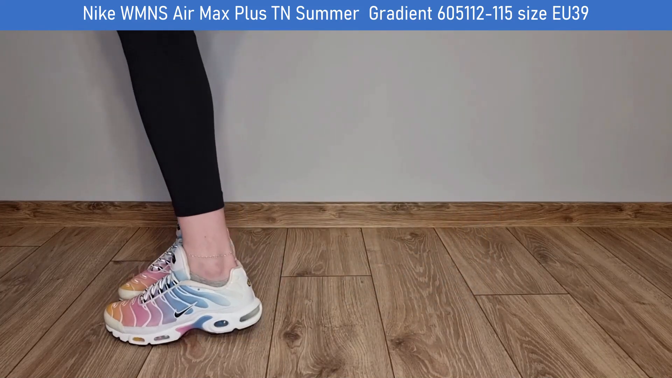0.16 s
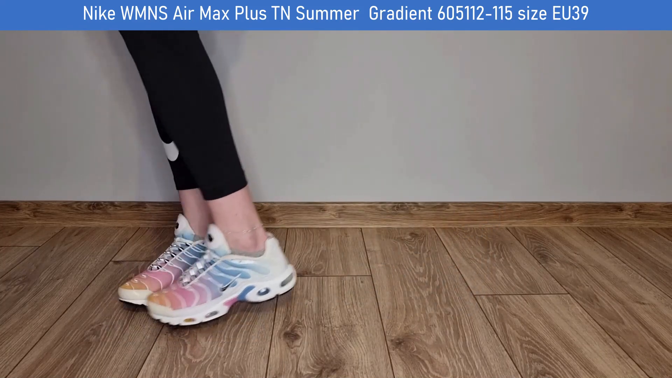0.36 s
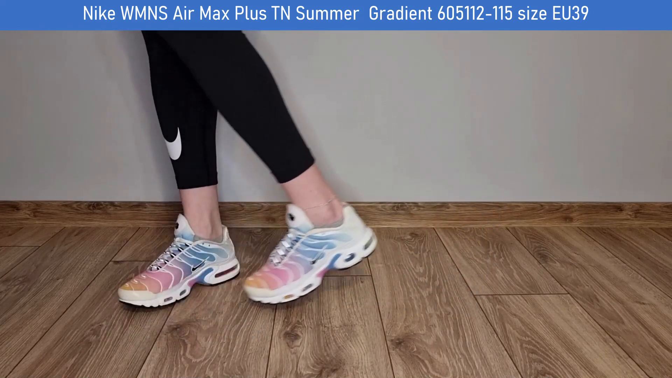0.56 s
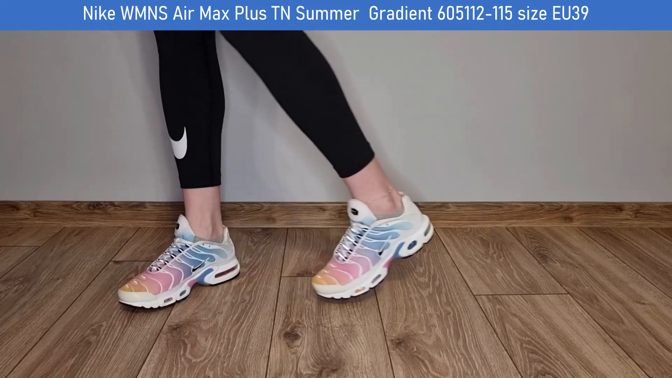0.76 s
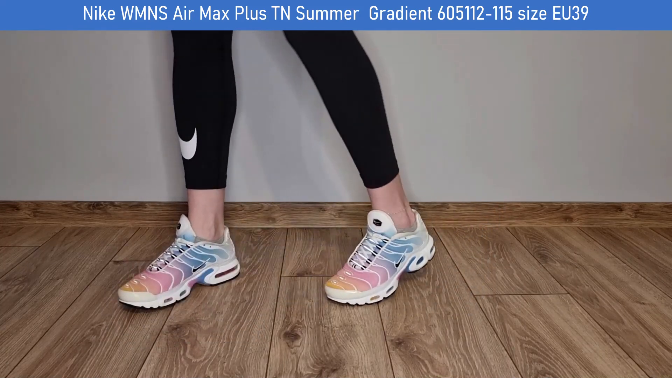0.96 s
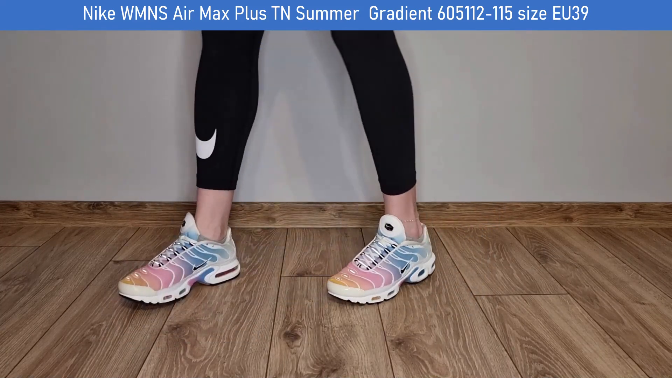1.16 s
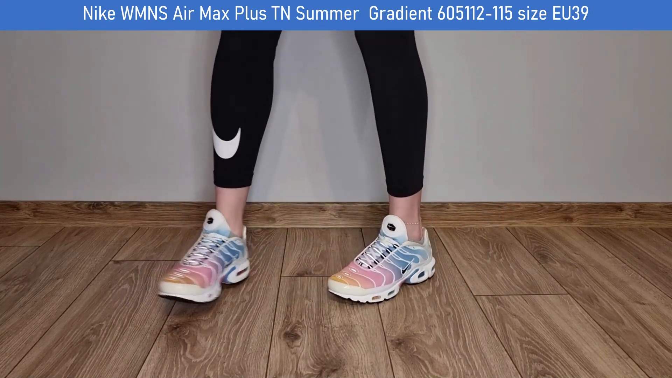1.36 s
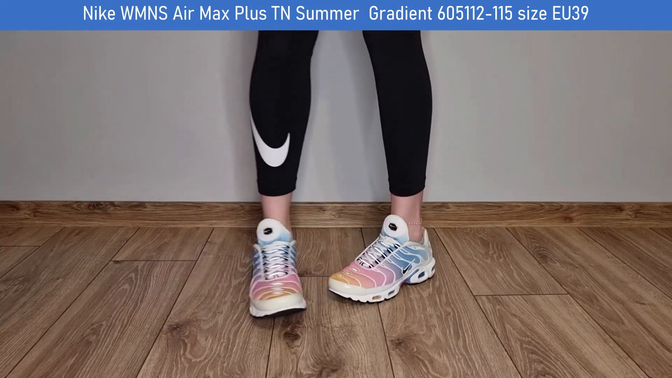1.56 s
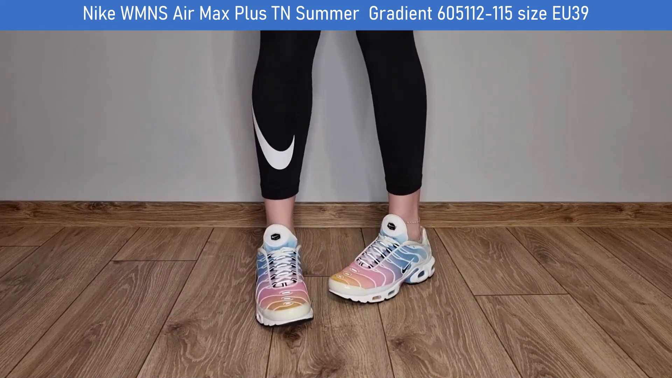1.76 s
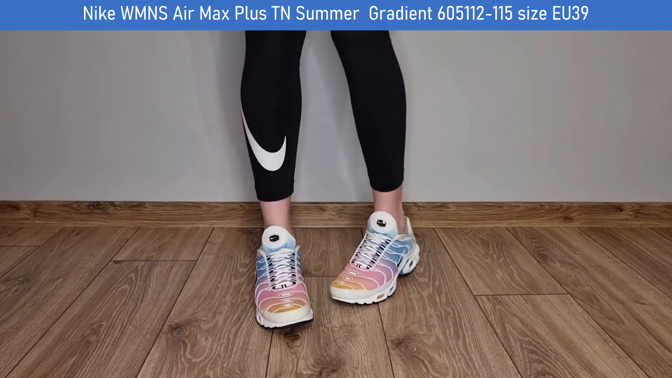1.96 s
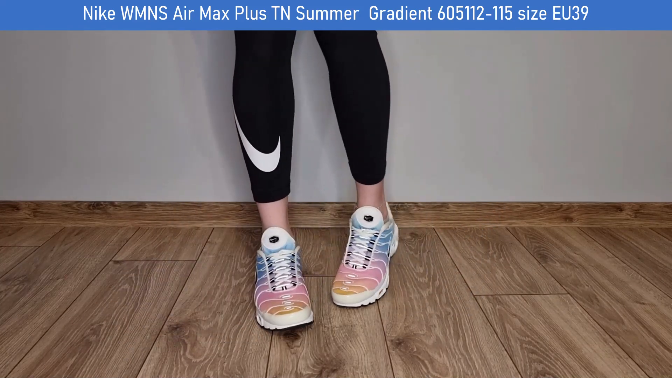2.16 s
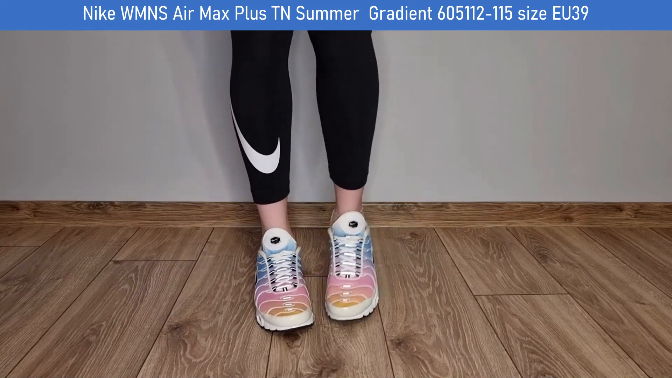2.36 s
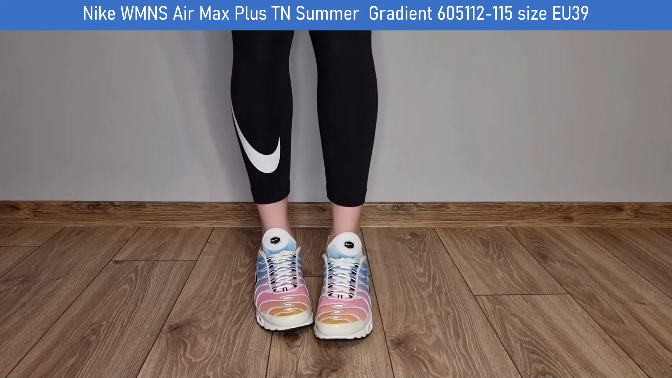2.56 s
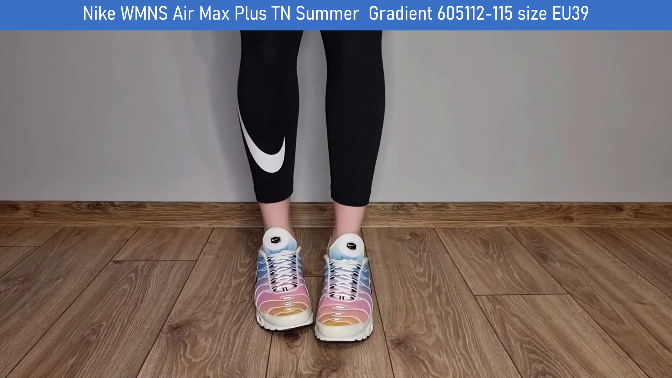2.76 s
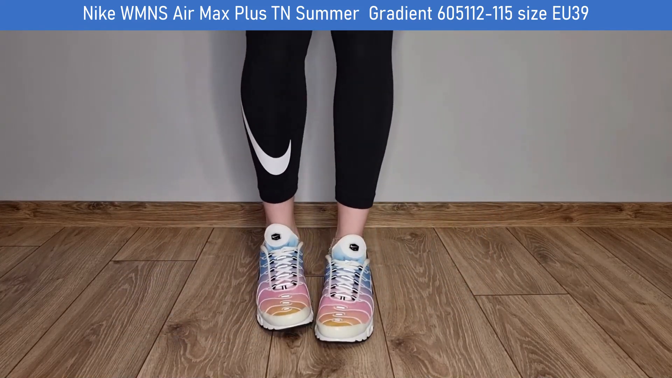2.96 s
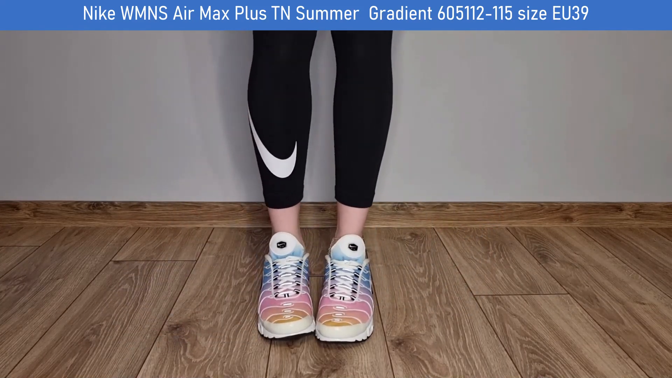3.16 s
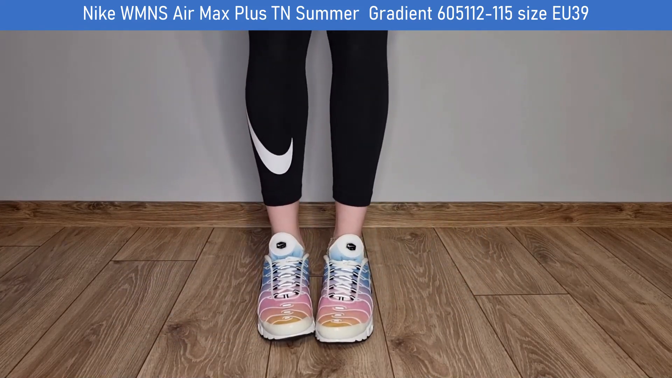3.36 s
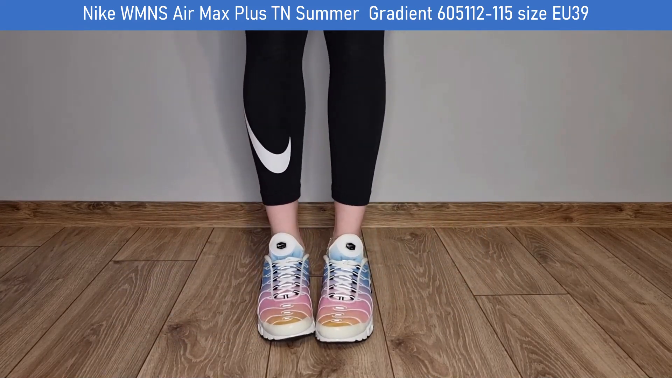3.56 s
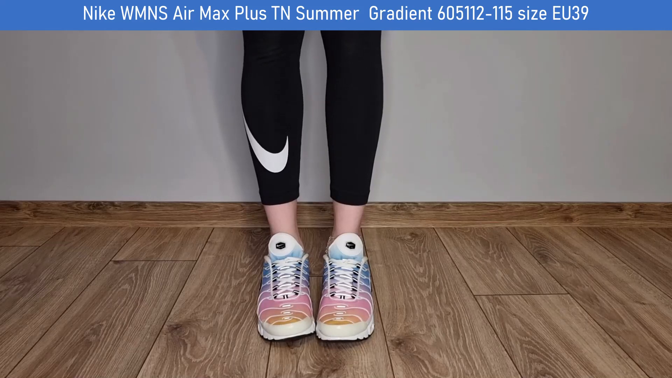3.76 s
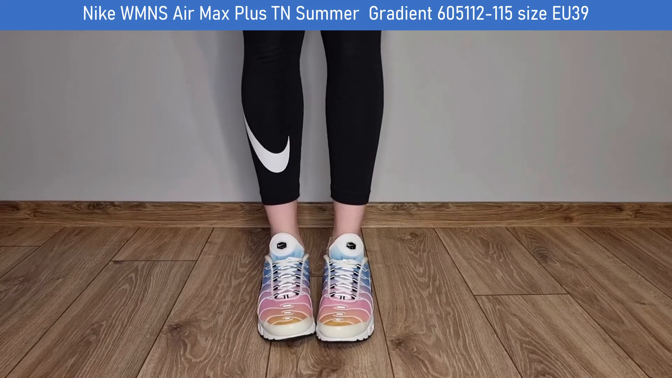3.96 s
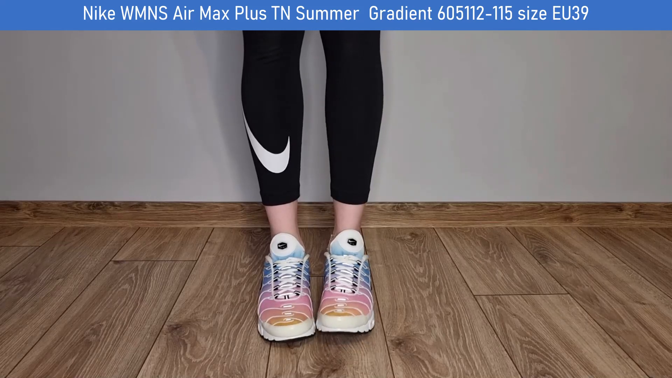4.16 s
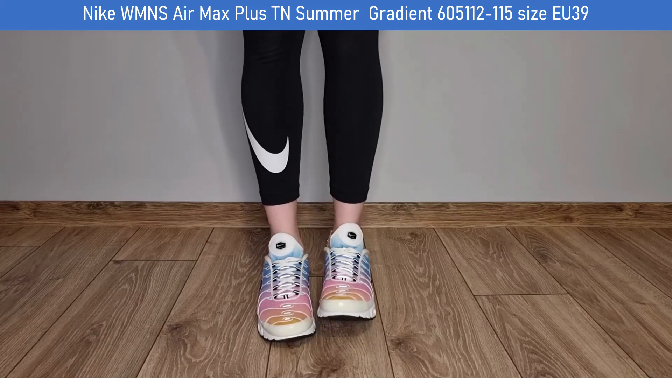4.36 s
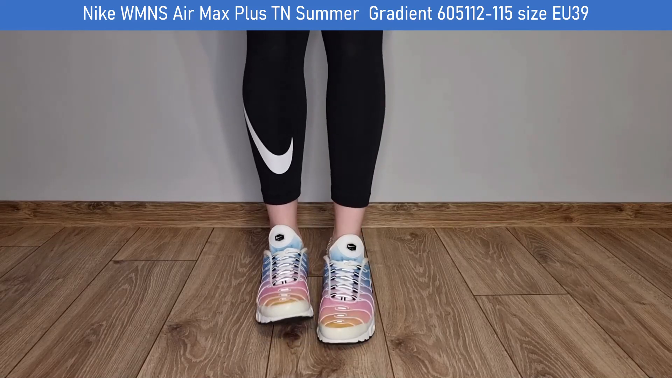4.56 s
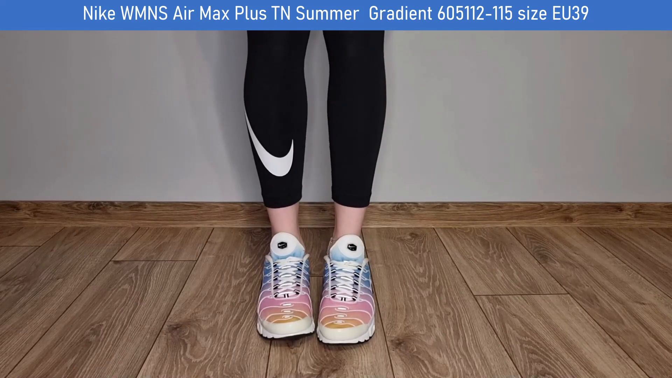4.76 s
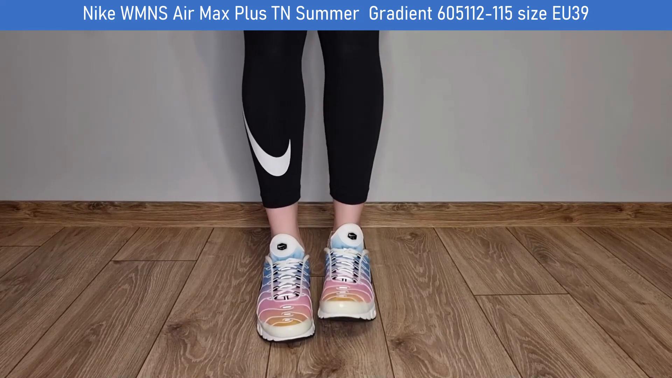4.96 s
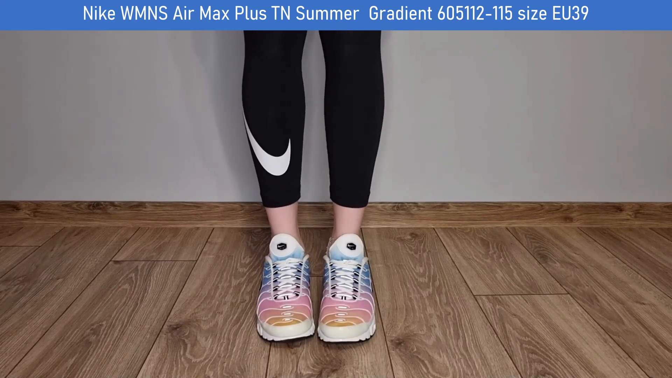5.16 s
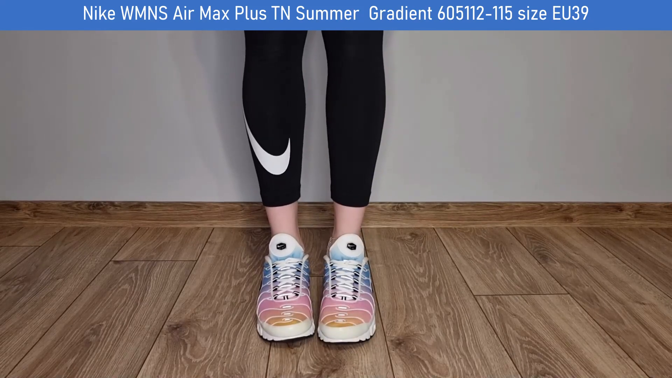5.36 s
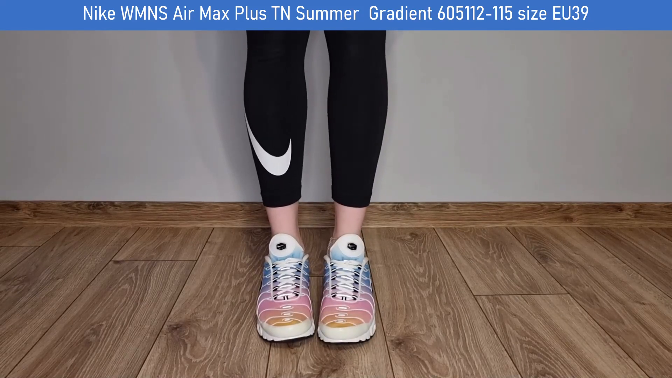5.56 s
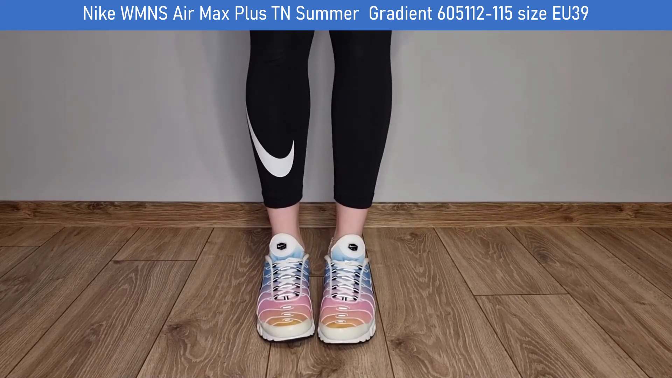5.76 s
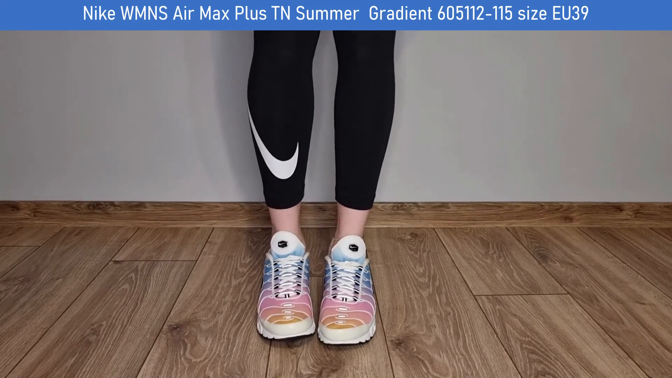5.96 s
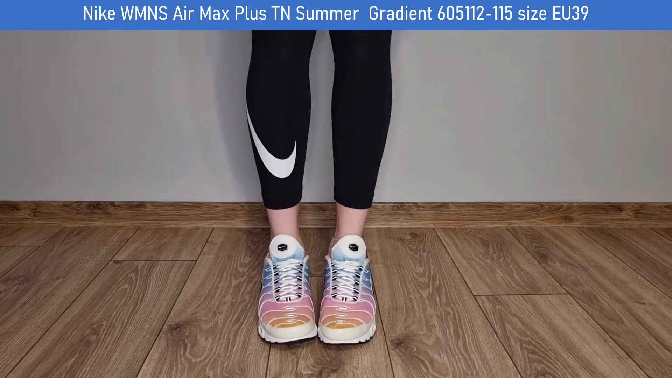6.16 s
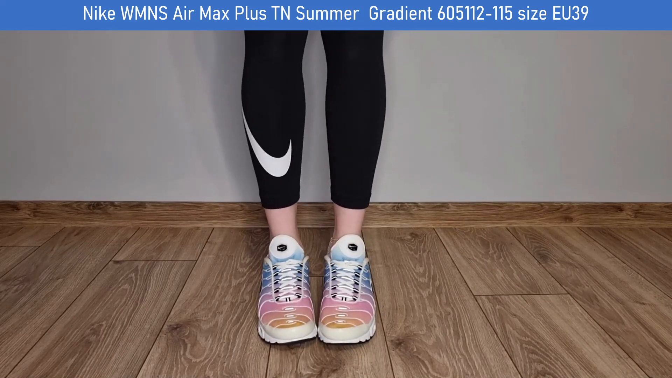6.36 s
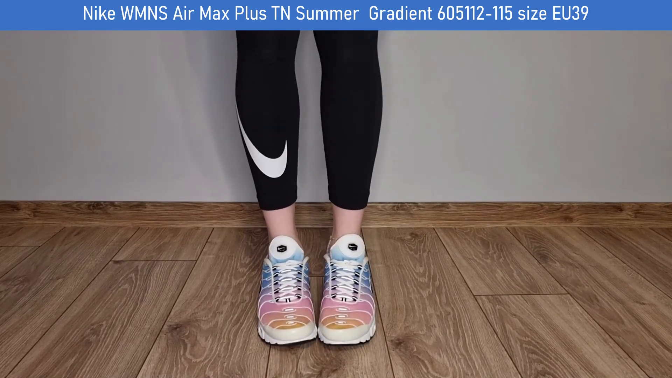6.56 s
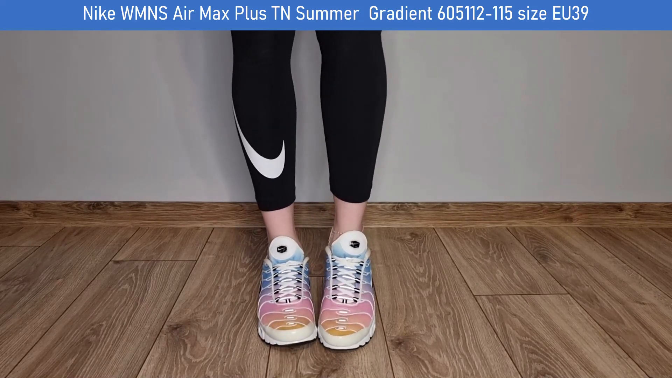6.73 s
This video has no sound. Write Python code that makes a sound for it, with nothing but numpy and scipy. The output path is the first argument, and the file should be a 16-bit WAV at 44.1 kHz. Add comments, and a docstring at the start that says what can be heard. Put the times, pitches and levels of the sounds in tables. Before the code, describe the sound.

Soft low footfall thuds with dull rubbery slaps on floating boards, uneven pauses between them, a quiet low hum and faint air behind.

```python
"""Footwork on a laminate floor

Sneakers step, shuffle and tap their toes in a small bare room, a metre or two from a stereo pair of microphones.
Each landing excites damped modes of the floating boards, and the rubber tread slaps them as filtered noise
bursts that the room answers with decaying noise. Cloth and sole rub as swelling bands of noise.
An appliance hums behind the microphones in wavering sines over a faint rush of shaped noise."""
import sys
import numpy as np
from scipy import signal
from scipy.fft import rfft, irfft, next_fast_len
from scipy.io import wavfile
from scipy.ndimage import map_coordinates

SR = 44100
rng = np.random.default_rng(int(sys.argv[2]) if len(sys.argv) > 2 else 0)


def unload_audio(sound):
    """Save the sound as a 16-bit wav file, at the path given as the first command line argument."""
    columns = np.transpose(np.atleast_2d(sound))
    # keep every value between -1 and 1, then stretch to whole-number steps
    steps = np.round(np.clip(columns, -1, 1) * 32767)
    wavfile.write(sys.argv[1], SR, steps.astype(np.int16))


N = 299703  # samples

# spectrum of the air's rush: freq_hz, density_db (per Hz, relative)
AIR_SPECTRUM = [(20, -14), (60, -11), (130, -11.5), (190, 1.5), (250, -8.5), (400, -2), (520, -7),
                (800, -11), (1750, -19.5), (2300, -30.5), (4500, -35), (6200, -32.5), (7500, -39),
                (10000, -46.5), (11900, -38.5), (12400, -43), (15700, -45)]
# likeness of the air's two channels: freq_hz, correlation (-1 to 1)
AIR_LIKENESS = [(60, -0.61), (110, 1), (200, 0.93), (360, 0.74), (640, -0.37), (1160, -0.61), (2100, -0.25),
                (3800, -0.018)]
# motor tones: pitch_hz, level_db (rms before waver), left_over_right_db, left_lead_rad, waver_db (scale of the drift)
HUM_TONES = [(193.9, -71.5, -3, 0.59, 2.5), (386.6, -62, -9, 0.52, 1.38), (524, -88, 0, 0, 2.5),
             (583.4, -80.5, 1.5, 2.33, -1), (1280, -93.5, 6, 2, -2.5), (1736, -93.5, -5.5, 1.5, 0),
             (1716, -99, -6, -2, -1.7), (1982, -97, -3.5, 0.5, 2), (7977, -85, 0.5, -2, 1.16)]
# strokes of cloth and sole: full_level_s, level_db, held_s, treble_db (against the rest)
RUB_STROKES = [(.15, -77, 0.022, -0.5), (1.17, -79.5, 0.027, -5), (1.34, -77, .01, -3.5),
               (1.69, -78, 0.0037, -6), (1.95, -81, 0.058, -3), (2.13, -87.5, 0.18, 8),
               (2.32, -90, 0.0072, 5), (2.66, -82, 0.01, 11.5), (2.9, -89.5, 0.16, 6),
               (4.22, -87, 0.029, 2), (4.52, -80, 0.011, 6), (4.62, -87, 0.043, 4.5), (6.52, -81.5, .3, 7)]
# spectrum of the rubbing: freq_hz, density_db (per Hz, relative)
RUB_SPECTRUM = [(900, -22.5), (2000, -1), (4000, -5.5), (6200, 0.5), (7400, -10), (8500, -20), (12000, -18),
                (15500, -13)]
# weight landing on the boards: start_s, level_db, favoured_pitch_hz, ring_length (0-1, left by the resting sole)
LANDINGS = [(.887, -29.5, 185, 0.84), (0.934, -32.5, 45.8, 0.32), (1.1, -60, 98, 0.67),
            (1.239, -44.5, 114, 0.77), (1.262, -43.5, 80.6, 0.4), (1.32, -72, 45.7, 0.8),
            (1.587, -45.5, 87, 1), (1.651, -41.5, 94, 0.4), (1.69, -46, 36.3, 0.45),
            (1.81, -50.5, 106, 0.4), (1.981, -56, 40, 0.16), (2.36, -45.5, 44.7, 0.14),
            (2.618, -35.5, 90.5, 0.56), (2.675, -33, 67, 0.34), (3.179, -28, 95, 1),
            (3.207, -24.5, 87, 0.57), (3.788, -55.5, 97, 1), (3.843, -49.5, 99, 0.29),
            (4.196, -55, 113, 0.93), (4.24, -61.5, 79.2, 0.01), (4.504, -44, 140, 0.97),
            (4.518, -25, 131, 0.89), (4.827, -24, 123, 0.98), (5.143, -38.5, 103, 0.86),
            (5.157, -24, 122, 0.81), (6.106, -33.5, 87.7, 1)]
# modes of boards and room together: pitch_hz, level_db, t60_s (before the resting sole shortens it)
BOARD_MODES = [(31, -14.5, 1), (45, 1.5, 0.42), (66.44, -2.5, 0.41), (77.7, -9, 0.39), (90.6, 2, 0.24),
               (104.5, -5, 0.27), (117.1, -10, 0.39), (136.7, -10, 0.47), (152.2, -1.5, 0.28),
               (169.2, -15.5, 0.28), (185, -13, 0.44), (223, -19.5, 0.52), (256, -21, 0.27),
               (294, -15.5, 0.2), (317.4, -9.5, 0.37), (359, -10, 0.43), (394.7, -14, 0.16)]
# tread meeting the floor, a low knock of the sole and a high click of its blocks: contact_s,
# knock_db, knock_tilt_db (per octave), knock_note_hz, knock_note_db,
# click_db, click_tilt_db (per octave), click_note_hz, click_note_db
TREAD_CONTACTS = [(.137, -65.5, 4.5, 1610, 6, -84, 18, 4800, 5),
                  (.154, -71, 8, 1960, 3.5, -75, 17, 5000, 3),
                  (.323, -77.5, -12.5, 800, -2, -87, -5.5, 3000, -2),
                  (.888, -65, -18.5, 486, 8, -62, -1.5, 3550, 7),
                  (.945, -69, -16, 554, 6, -93, -6, 3600, 10), (1.156, -78, -5, 900, 4, -82.5, 24, 6200, 6),
                  (1.167, -78, -5, 894, -2, -84, 18, 6300, 1),
                  (1.187, -66.5, -5.5, 850, 3.5, -74.5, 0, 4300, 15.5),
                  (1.3, -73.5, -11, 1170, 9.5, -68.5, 8, 3000, 9),
                  (1.588, -66.5, -5, 550, 8.5, -78, -3, 6200, 10),
                  (1.652, -65.5, -7, 696, 4, -85, 6, 6200, 11),
                  (2.616, -61.5, -5, 2000, 12, -70.5, -3, 4250, 11),
                  (2.636, -67, 8, 900, 2, -63, 3, 4400, 11.5), (3.168, -76, 1, 1600, 0, -80, -5, 3030, 12),
                  (3.177, -51.5, 1.5, 1660, 3.5, -59.5, -6, 3000, 14),
                  (3.19, -59.5, -3, 1620, 0, -69, -8, 3850, 11),
                  (3.214, -57, 1, 860, 5, -75, -14, 2500, 13),
                  (4.203, -68.5, -5, 890, -11, -81.5, 12, 6000, 3),
                  (4.506, -64.5, 4, 1800, 9.5, -58.5, 6, 3600, 8),
                  (4.518, -45.5, 0, 1000, 5, -58, -20, 2700, 5),
                  (4.552, -57, 1, 1150, 7.5, -80.5, -6, 2600, 2),
                  (4.822, -74, 5, 1200, -1.5, -67, -13.5, 3000, -2),
                  (4.8267, -45.5, -4.5, 1000, 8, -40, -17.5, 4000, 6.5),
                  (4.83, -40.5, -5.5, 1220, 8.5, -57, -28.5, 2900, -4),
                  (5.143, -57, 2, 2050, 9, -60.5, 7.5, 4500, -1),
                  (5.156, -46, -2.5, 1220, 5, -55.5, -8, 4200, 3),
                  (5.529, -85.5, -6, 716, 3, -93, 9, 6000, 0),
                  (6.105, -47.5, 0.5, 747, 1.5, -56, -19.5, 3200, 6),
                  (6.5, -74, -7.5, 900, -3, -79, 13, 4500, 9)]
# edges of the tread's bands, thump, knock, clack, slap, smack and tick: edge_hz
TREAD_EDGES_HZ = [300, 700, 1450, 2400, 3400, 4750, 7400]
# the tread's colour in those bands, three for the knock, three for the click: level_db
TREAD_COLOUR_DB = [-4.5, -2, -6, -5, -6.5, -8.5]
# width of the notes that sole and blocks ring on: width_octaves
NOTE_WIDTH_OCTAVES = [.3, 0.093]
# peaks and dips the laminate gives every slap: freq_hz, gain_db
LAMINATE = [(500, 1), (620, -6.5), (750, 5), (950, -2), (1150, 0), (1400, -4), (1700, 4.5), (2200, -0.5),
            (3000, -0.5), (3300, 2.5), (3600, 5), (4250, 0), (4500, -6), (5200, 2.5), (6300, 1.5)]
# reverberation time of the room: freq_hz, t60_s
ROOM_DECAY = [(300, 0.49), (800, 0.39), (2000, 0.34), (3000, 0.32), (4500, 0.34), (9000, 0.2)]
# room against direct sound: freq_hz, gain_db
ROOM_GAIN = [(400, 4), (1000, 9), (3000, 1.5), (6500, 4.5)]

TOP_HZ = 15720  # upper band limit of the microphones
RISE_DB_PER_S, FALL_DB_PER_S = 244, 167  # slopes of a rubbing stroke
GRIT_DB = 3.5  # how unevenly grit catches under a rubbing sole
RUB_TREBLE_HZ = 8200
KNOCK_HZ, CLICK_HZ = 1000, 3900  # centres that the tilts turn about
SKIRT_DB = 4  # the click spills into the band below it, this much down
ROOM_SAMPLES = SR * 2 // 5  # 0.4 s


def amp(db):
    """Decibels as an amplitude ratio."""
    return 10 ** (np.asarray(db) / 20)


def unit(x):
    """Normalisation to an rms of 1."""
    return x / np.sqrt(np.mean(x ** 2) + 1e-20)


def along(points, hz):
    """Linear interpolation of (Hz, value) points on a logarithmic frequency axis."""
    f, v = np.transpose(points)
    return np.interp(np.log(hz + 1), np.log(f + 1), v)


def wobble(rate):
    """Band-limited drift: a spline through random knots, rate knots a second."""
    coarse = np.arange(0, N + 64, 64)
    knots = rng.standard_normal(int(N * rate / SR) + 5)
    curve = map_coordinates(knots, [coarse * rate / SR])
    return np.interp(np.arange(N), coarse, curve)


def filtered(x, response):
    """Linear filtering: the spectrum of x times a response of frequency."""
    m = next_fast_len(x.shape[-1] + SR // 2)
    spectrum = rfft(x, m) * response(np.fft.rfftfreq(m, 1 / SR))
    return irfft(spectrum, m)[..., :x.shape[-1]]


def add(track, s, sound):
    """Superposition: a stereo sound joins the track at time s."""
    start = round(s * SR)
    part = track[:, start:start + sound.shape[1]]
    part += sound[:, :part.shape[1]]


def rush(spectrum, alike):
    """Partly coherent stereo noise of rms 1: the mid-to-side ratio sets the correlation of the channels."""
    def mid_side_gain(hz):
        turn = np.arccos(np.clip(along(alike, hz), -1, 1)) / 2
        return amp(along(spectrum, hz)) * [np.cos(turn), np.sin(turn)]

    mid, side = filtered(rng.standard_normal((2, N)), mid_side_gain)
    return unit(np.array([mid + side, mid - side]))


def air():
    """Broadband turbulence: the steady rush of the room as shaped noise, 1.4 dB stronger on the right."""
    balance_db = np.array([[-.7], [.7]])
    return amp(-69.5 + 0.33 * wobble(0.2) + balance_db) * rush(AIR_SPECTRUM, AIR_LIKENESS)


def hum():
    """Tonal radiation: slightly unsteady motor tones, placed by level and phase between the channels."""
    t, ear = np.arange(N) / SR, np.array([[.5], [-.5]])
    track = np.zeros((2, N))
    for hz, db, pan_db, lead_rad, waver_db in HUM_TONES:
        separate_drift = np.array([wobble(13), wobble(21)])
        waver = amp(waver_db * (wobble(11) + 1.1 * separate_drift))
        phase = 2 * np.pi * hz * t + 0.28 * wobble(9.1) + lead_rad * ear
        track += np.sqrt(2) * amp(db + pan_db * ear) * waver * np.sin(phase)
    return track


def shuffle():
    """Friction noise: fabric and sole rub faintly as the legs move; each stroke swells, holds and fades."""
    s, db, held, treble_db = np.transpose(RUB_STROKES)[..., None]
    t = np.arange(N) / SR
    rise_db = RISE_DB_PER_S * np.maximum(s - t, 0)
    fall_db = FALL_DB_PER_S * np.maximum(t - s - held, 0)
    strokes = amp(db - rise_db - fall_db)
    rub = rush(RUB_SPECTRUM, [(1000, 0.18)])
    top = filtered(rub, lambda hz: hz > RUB_TREBLE_HZ)
    body_level = strokes.sum(axis=0)
    top_level = amp(0.98 * wobble(6.7)) * np.sum(amp(treble_db) * strokes, axis=0)
    grit = amp(2.0 * wobble(60) + GRIT_DB * (wobble(350) - 0.75))
    return grit * (body_level * (rub - top) + top_level * top)


def thuds():
    """Modal excitation: the boards dip under the sole, then ring; where the weight lands favours some modes."""
    track, t = np.zeros((2, N)), np.arange(SR * 2 // 5) / SR
    hz, level_db, t60 = np.transpose(BOARD_MODES)[..., None]
    swell = 1 - np.exp(-t * hz / 1.85)  # build-up time constant in cycles
    for s, db, centre_hz, length in LANDINGS:
        favour_db = -7 * np.log2(hz / centre_hz) ** 2 + rng.normal(0, 1.6, hz.shape)
        loose = 1 + rng.normal(0, 0.014, hz.shape)  # the load on the boards shifts their pitch
        phase = 2 * np.pi * hz * loose * (t - .0048) + rng.normal(0, 0.64, hz.shape)
        decay_db = 60 * t / (t60 * length)
        ring = amp(level_db + favour_db - decay_db) * swell * np.sin(phase)
        mode_gain = amp(db + rng.normal(0, 2.0, (2, len(BOARD_MODES))))  # each channel hears its own mix
        add(track, s, mode_gain @ ring)
    return track * amp([[-1], [1]])


def tail():
    """Diffuse reverberation: a fresh noise answer of the room, each frequency dying at its own speed."""
    hz, t, z = signal.stft(rng.standard_normal((2, ROOM_SAMPLES)), SR, nperseg=256)
    z = z * amp(-60 * t / along(ROOM_DECAY, hz)[:, None])
    energy = np.mean(abs(z) ** 2, axis=2, keepdims=True)
    z = z * amp(along(ROOM_GAIN, hz)[:, None]) / np.sqrt(energy * SR * 2 / 5 * 170)
    near, far = signal.istft(z, SR, nperseg=256)[1]
    # nearest wall is a few ms away; spaced ports hear it partly opposed
    return np.pad([near, far - 0.23 * near], ((0, 0), (130, 0)))


def causal(points, rings, size=2048):
    """Minimum phase: the most compact impulse response with a given colour and notes, through the laminate."""
    hz = np.fft.rfftfreq(size, 1 / SR)
    ring_db = 0
    for (note_hz, db), width in zip(rings, NOTE_WIDTH_OCTAVES):
        ring_db = ring_db + db * np.exp(-(np.log2((hz + 1) / note_hz) / width) ** 2)
    # folding the cepstrum onto positive time makes the response causal
    fold = irfft(np.log(amp(along(points, hz) + along(LAMINATE, hz) + ring_db)), size)
    fold[1:size // 2] *= 2
    fold[size // 2 + 1:] = 0
    return irfft(np.exp(rfft(fold)), size)


def contact(size=1100):
    """Impact force: the sole's edge brushes in ever harder for 25 ms, then the blocks land in a fast-dying burst."""
    t = np.arange(size) / SR
    unevenness = amp(2.9 * rng.standard_normal(size))
    brush = amp(-34 - 1400 * t[::-1]) * rng.standard_normal(size) * unevenness
    blocks = amp(-26 - 9500 * t[:size // 10]) * rng.standard_normal(size // 10)
    blocks[0] = -1  # first impact
    return np.concatenate([brush, blocks]), size / SR


def slaps():
    """Source and filter: contact force coloured by tread and tilted by how the sole lands; the room answers."""
    track, edge = np.zeros((2, N)), np.array(TREAD_EDGES_HZ)
    corners_hz = np.ravel([edge[:-1] * 1.095, edge[1:] / 1.06], "F")  # two per band
    tread_db = np.repeat(TREAD_COLOUR_DB - 20 * np.log10(np.diff(edge) / SR), repeats=2)
    for s, knock_db, knock_tilt_db, low_hz, low_db, click_db, click_tilt_db, high_hz, high_db in TREAD_CONTACTS:
        knock = knock_db + knock_tilt_db * np.log2(corners_hz / KNOCK_HZ)
        click = click_db + click_tilt_db * np.log2(corners_hz / CLICK_HZ)
        shared = np.maximum(knock[4:6], click_db - SKIRT_DB)
        levels_db = np.concatenate([knock[:4], shared, click[6:]])
        density_db = tread_db + levels_db + rng.normal(0, .8, len(corners_hz))
        bottom, last_db = (120, density_db[0] - 32.0), density_db[-1]
        colour = [bottom, *zip(corners_hz, density_db), (8200, last_db - 24.0), (SR / 2, last_db - 38.0)]
        force, lead = contact()
        slap = np.convolve(force, causal(colour, [(low_hz, low_db), (high_hz, high_db)]))[None]
        add(track, s - lead, slap * amp([[-1.7], [1.7]]))
        add(track, s - lead, signal.fftconvolve(slap, tail(), axes=1))
    return track


def scene():
    """Superposition of all sources, from the background to the footwork."""
    return air() + hum() + shuffle() + thuds() + slaps()


def record(dry):
    """Band limiting: the microphones keep nothing above their upper limit."""
    return filtered(dry, lambda hz: hz < TOP_HZ)


dry = scene()
out = record(dry)
unload_audio(out)
```